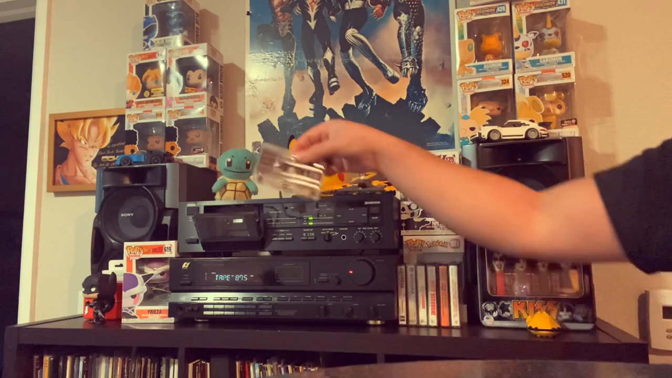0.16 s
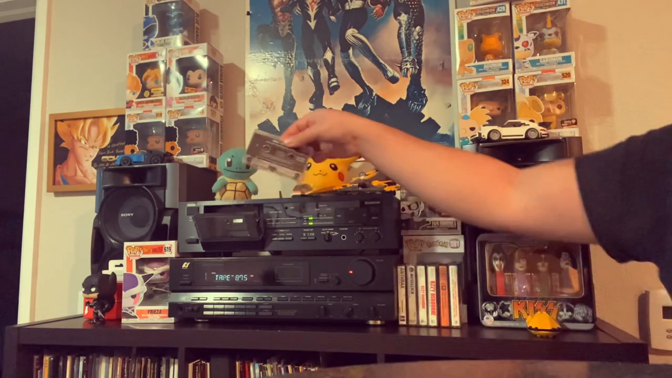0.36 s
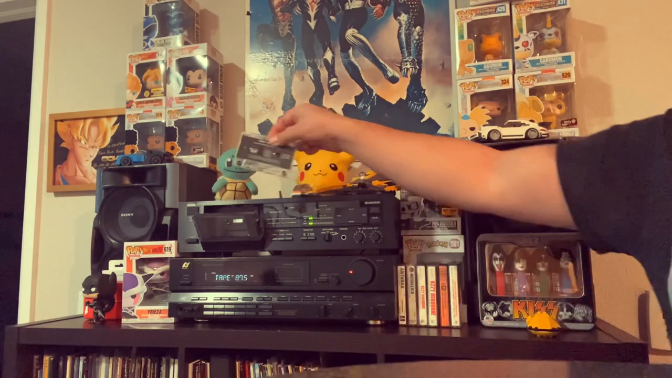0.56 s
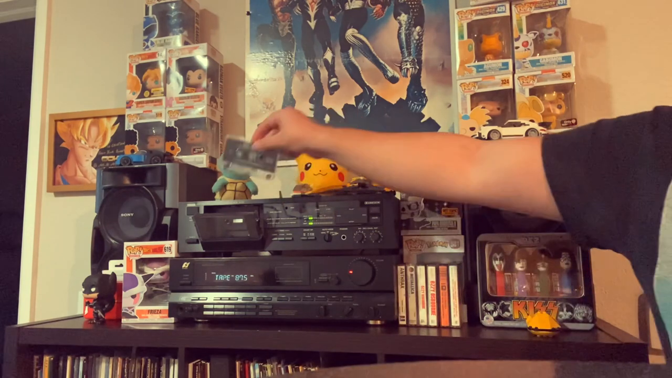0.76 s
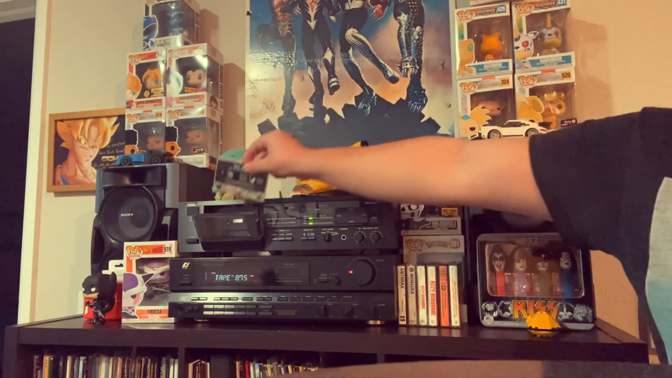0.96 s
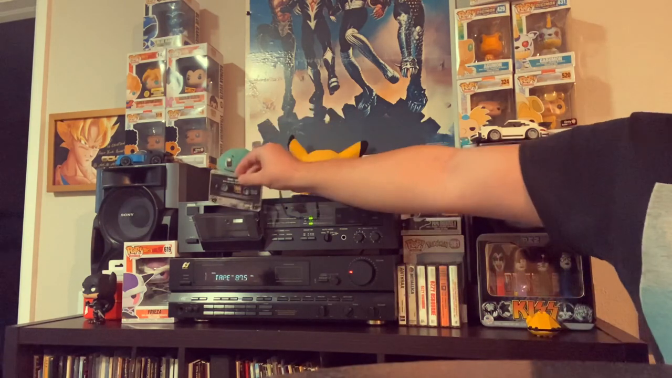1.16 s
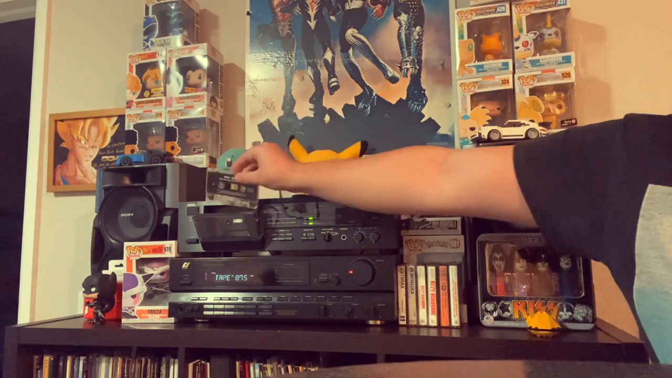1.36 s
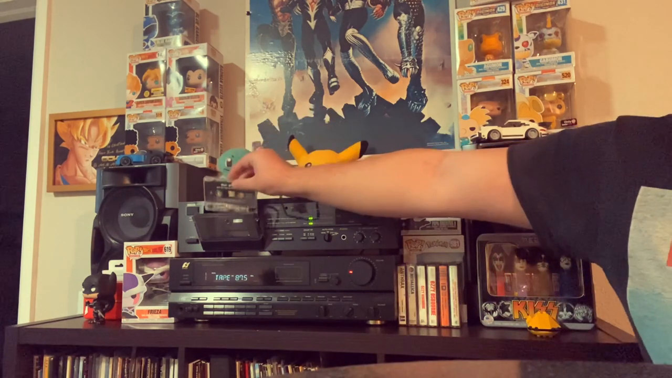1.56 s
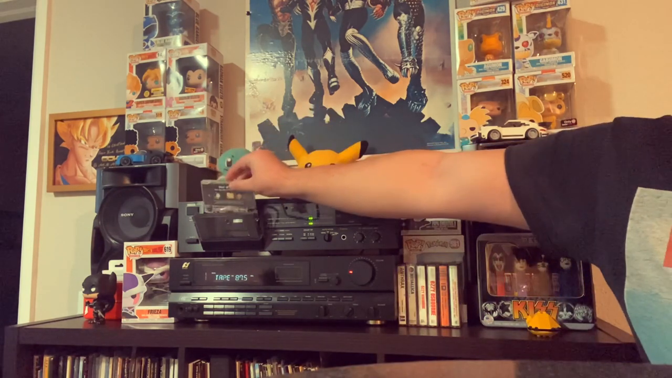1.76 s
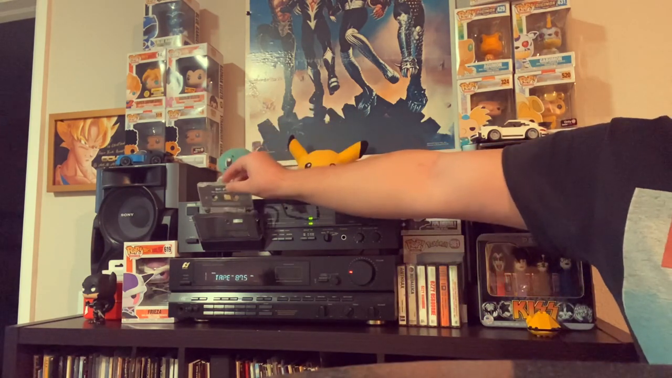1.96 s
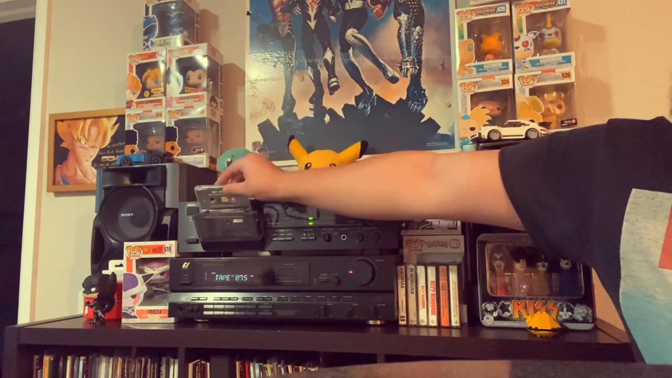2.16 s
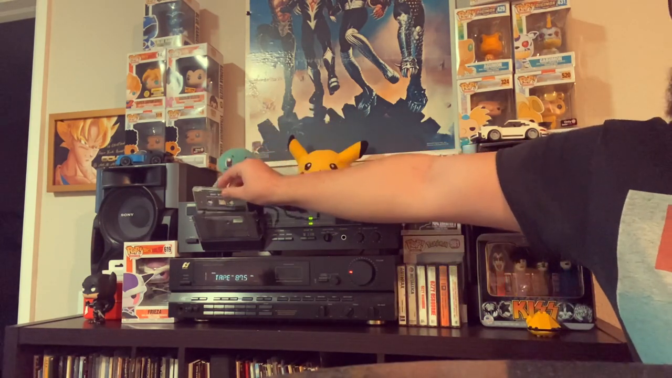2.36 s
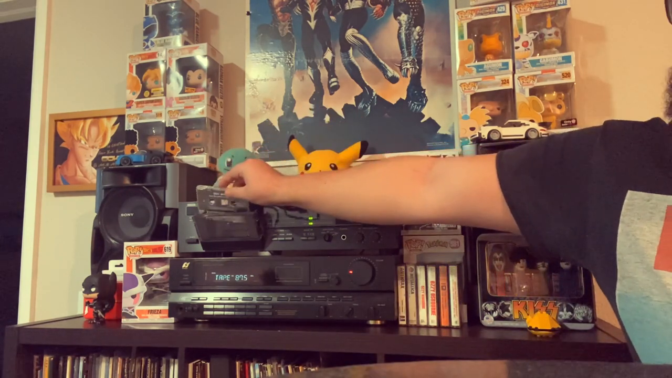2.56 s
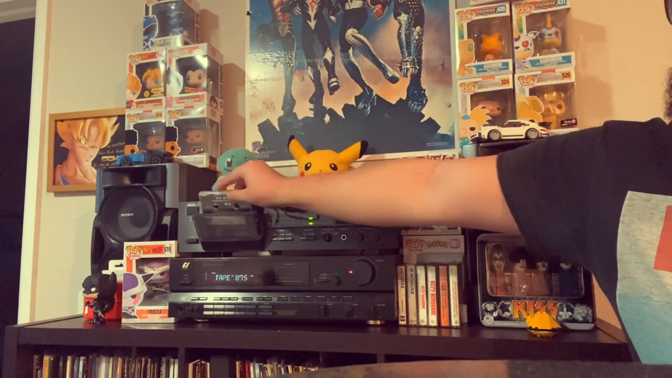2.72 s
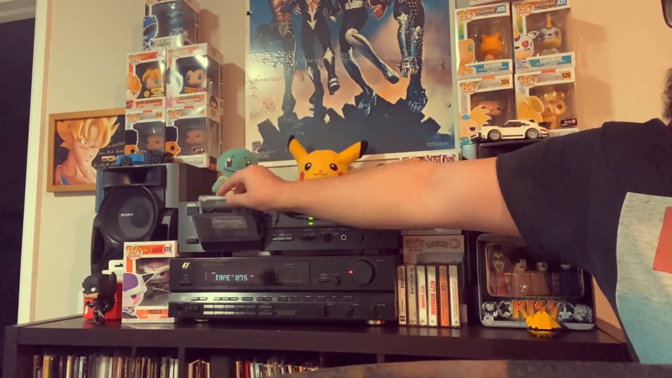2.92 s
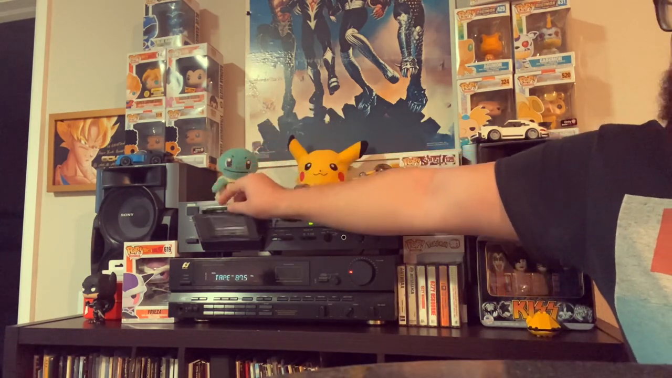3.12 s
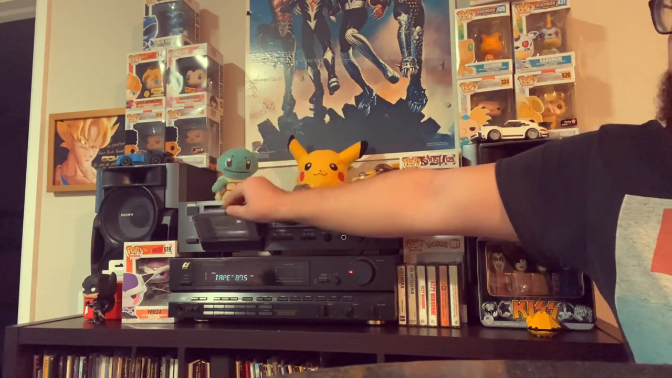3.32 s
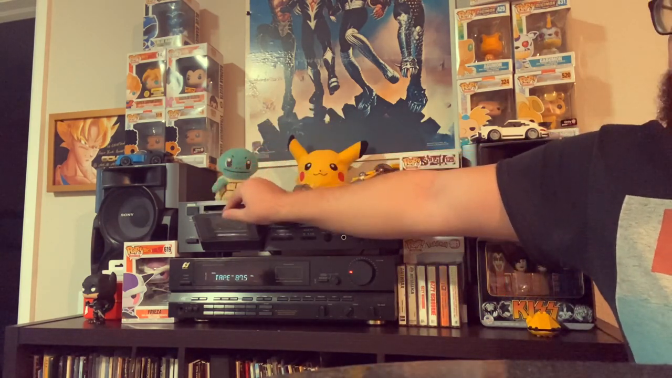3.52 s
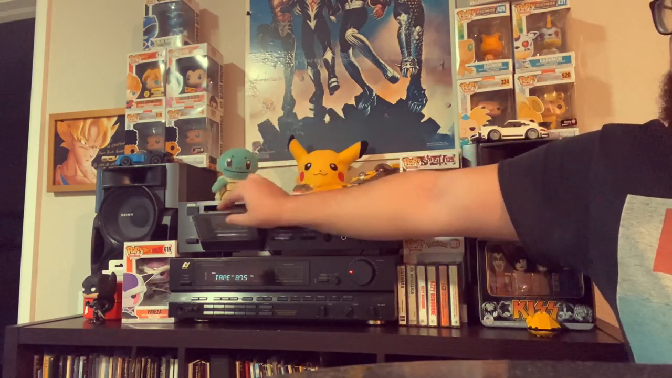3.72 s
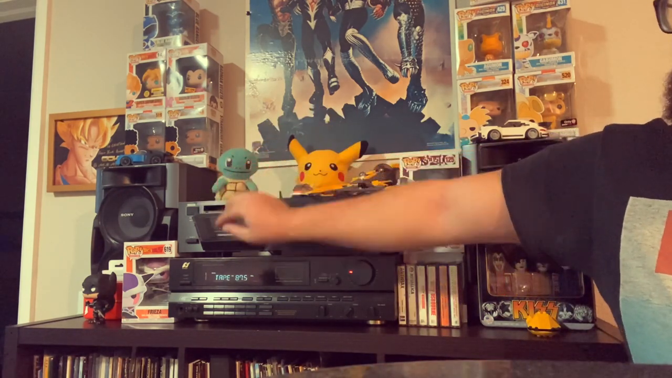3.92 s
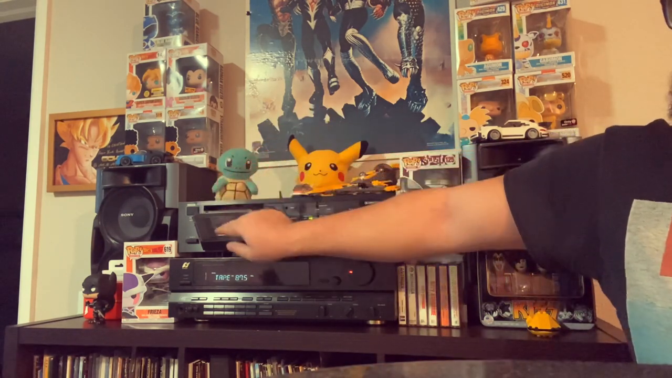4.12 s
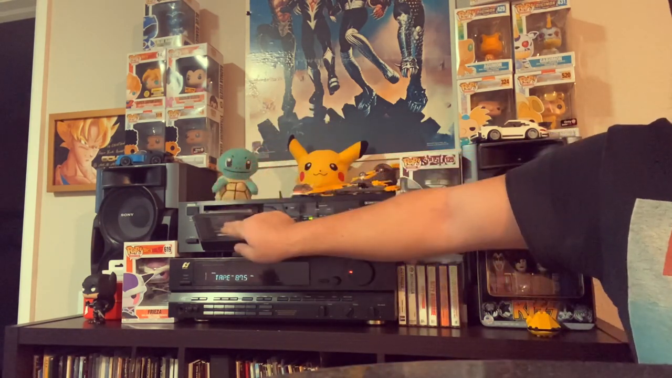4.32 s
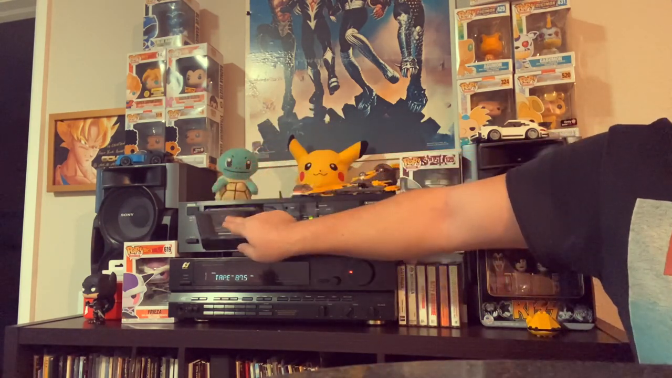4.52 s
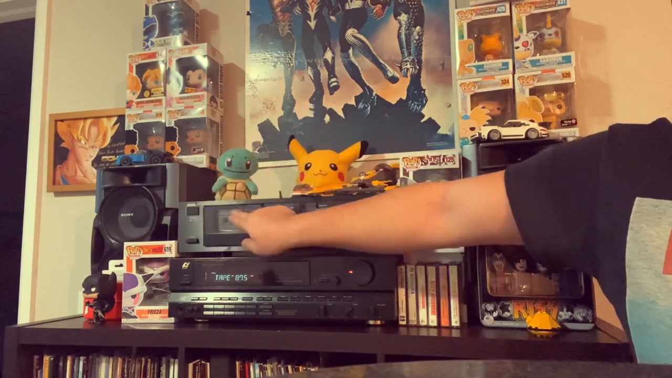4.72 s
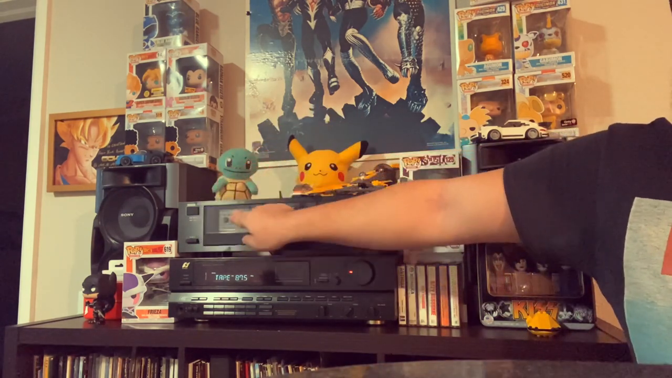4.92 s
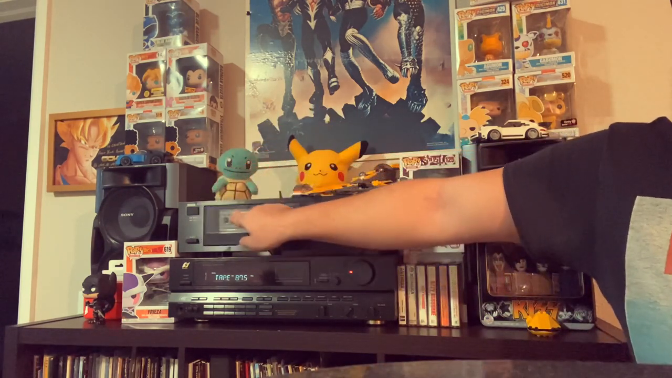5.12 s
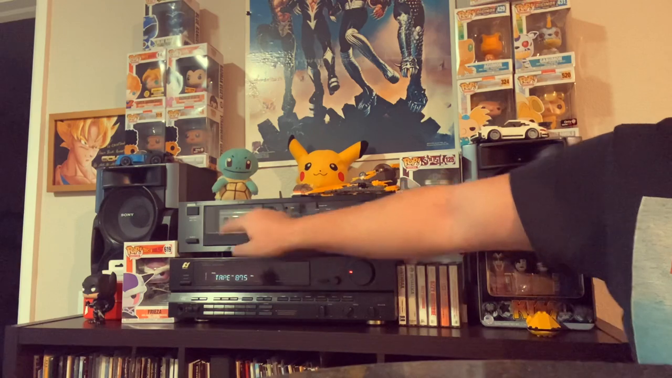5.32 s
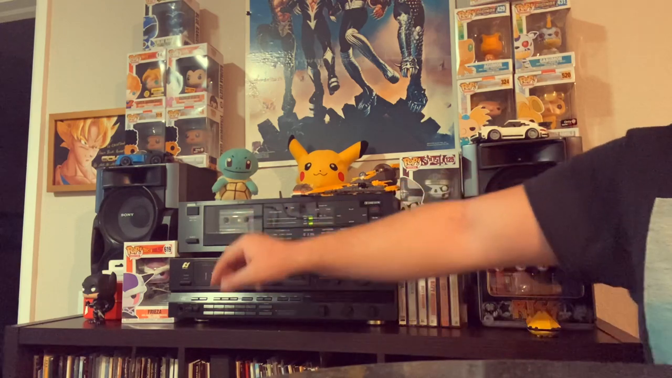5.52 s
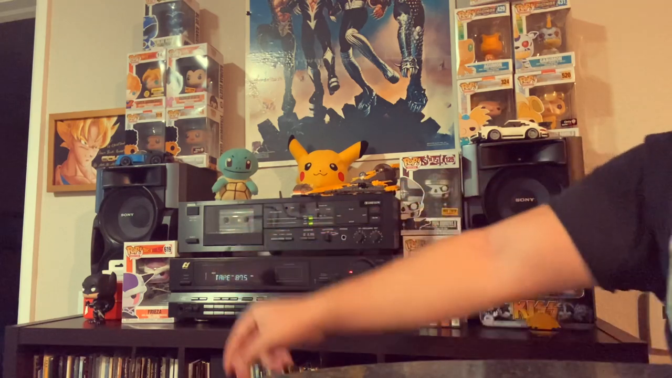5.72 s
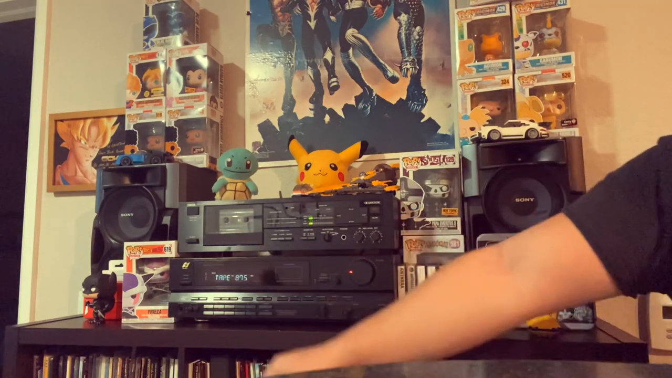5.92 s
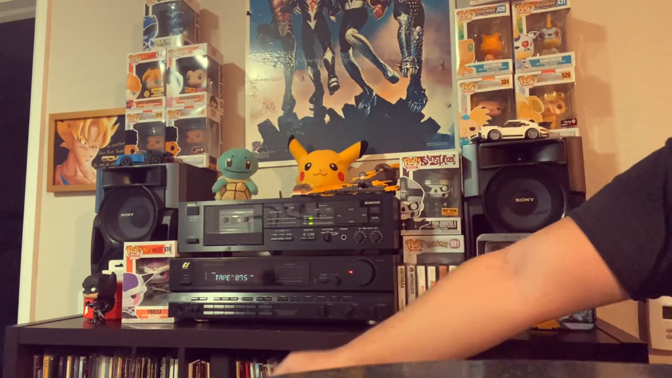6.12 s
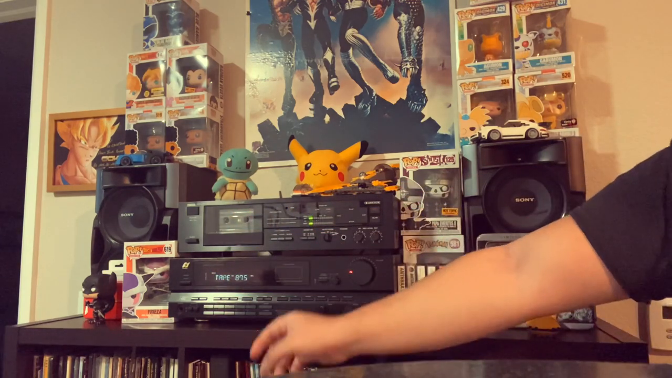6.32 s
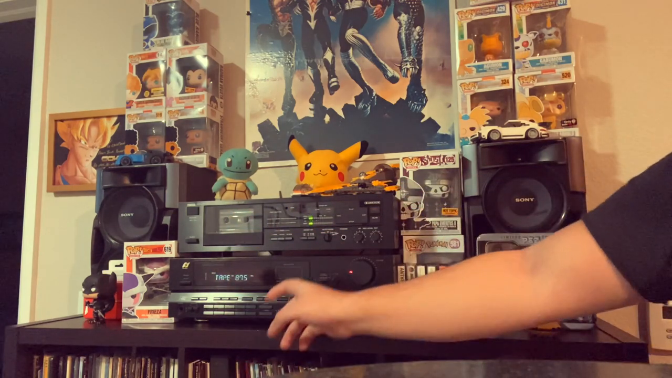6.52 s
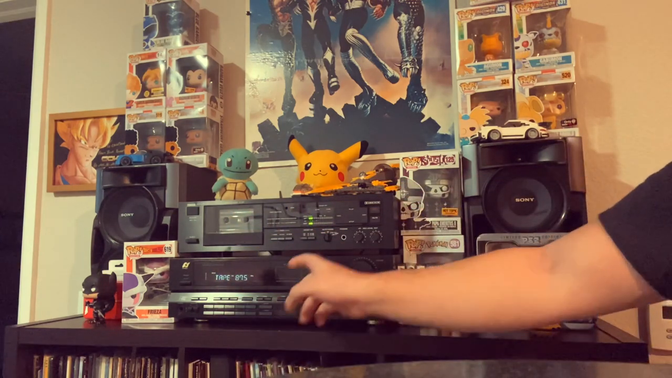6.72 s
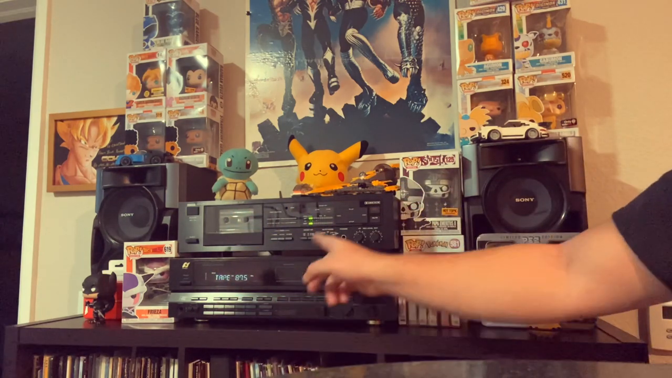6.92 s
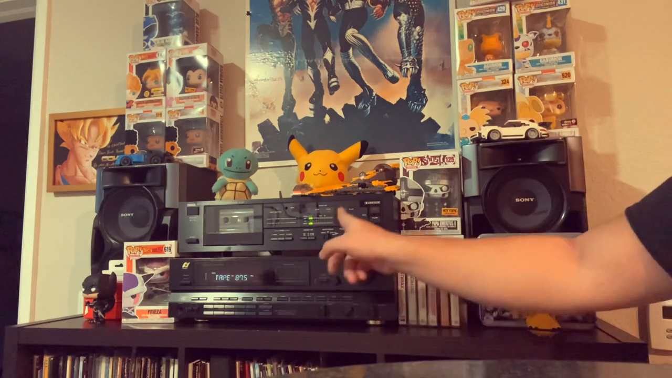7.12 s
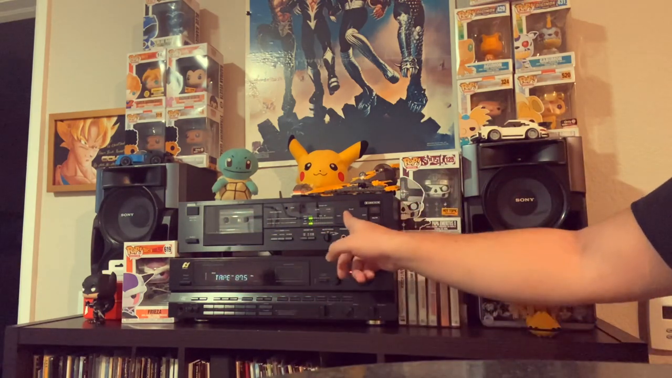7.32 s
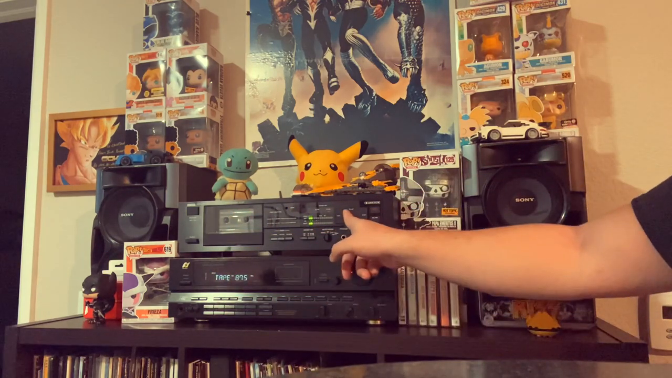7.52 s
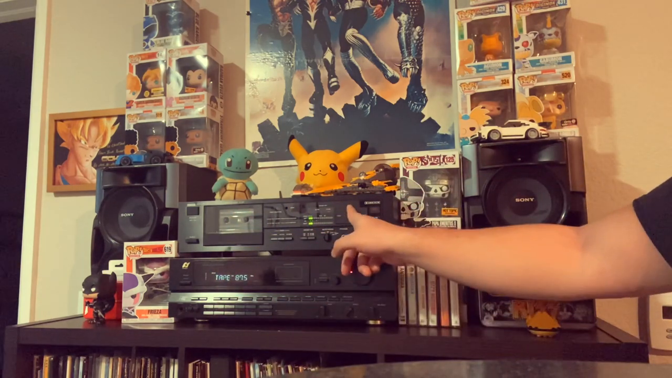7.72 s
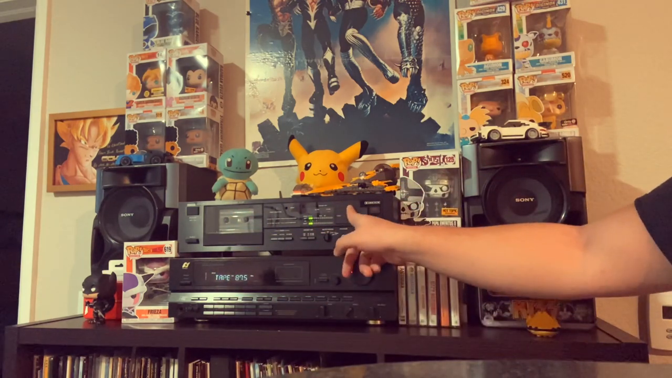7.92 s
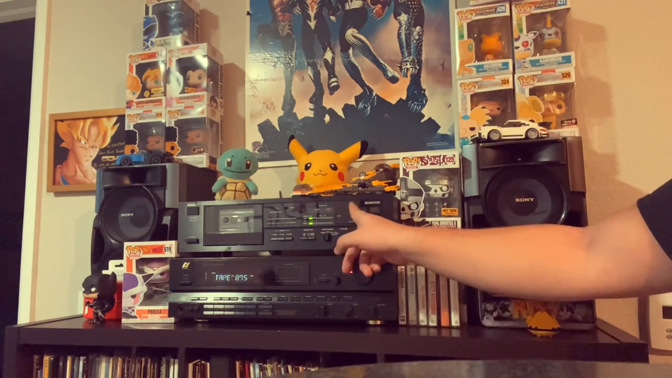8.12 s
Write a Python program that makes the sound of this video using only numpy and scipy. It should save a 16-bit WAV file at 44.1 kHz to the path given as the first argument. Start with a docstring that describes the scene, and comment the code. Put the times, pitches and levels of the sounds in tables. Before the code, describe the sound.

A cassette is fumbled into a tape deck in a small living room. Faint ticks and hollow taps lead to a tight rattle of plastic, then a firm clack as it drops in. After a pause, the door slides and chirps shut with a clattering burst and a sharp latch snap. A long quiet gap follows, then a button click and a chunky mechanical clunk. Stereo microphone at a short distance, with low hum and dark room noise.

```python
"""Cassette into a tape deck

A cassette is fumbled into the open door of a tape deck and drops home; the door squeaks shut and latches.
Then a button is pressed and the transport clunks into gear. Contacts are noise cracks that ring decaying
modes of the struck part; hollow knocks, sliding grit and stick-slip chirps join them. All of these echo
in a small living room, over drifting hum lines, a thin fluttering whine, room noise and soft low thuds.
"""
import sys
import numpy as np
from scipy import signal
from scipy.fft import rfft, irfft, next_fast_len
from scipy.io import wavfile
from scipy.ndimage import uniform_filter1d

SR = 44100
rng = np.random.default_rng(int(sys.argv[2]) if len(sys.argv) > 2 else 0)


def master(y):
    """Save y as 16-bit WAV."""
    cut = np.clip(np.atleast_2d(y).T, -1, 1)
    pcm = np.round(cut * 32767)  # scale
    wavfile.write(sys.argv[1], SR, pcm.astype(np.int16))


N = 360297


def amp(db):
    """Decibels to gain."""
    return 10 ** (np.asarray(db) / 20)


def unit(x):
    """Scales to rms 1."""
    return x / np.sqrt(np.mean(x ** 2) + 1e-20)


def read(points, hz):
    """Reads a table on a log-frequency axis."""
    f, value = np.transpose(points)
    return np.interp(np.log(hz + 1), np.log(f + 1), value)


def add(mix, s, sound):
    """Mixes a sound in at time s."""
    part = mix[:, max(round(s * SR), 0):][:, :sound.shape[1]]
    part += sound[:, :part.shape[1]]


def causal(db):
    """Minimum-phase spectrum with this gain: starts sharply, rings only afterwards."""
    log_gain = np.log(amp(np.concatenate([db, db[-2:0:-1]])))
    return np.exp(np.conj(signal.hilbert(log_gain)))[:len(db)]


def pair(z, likeness):
    """Makes two unrelated spectra into a partly alike left and right."""
    c = np.clip(likeness, -1, 1)
    return np.array([z[0], c * z[0] + np.sqrt(1 - c ** 2) * z[1]])


def wander(rate_hz):
    """A smooth random curve of rms 1."""
    hz = np.fft.rfftfreq(N, 1 / SR)
    return unit(irfft(rfft(rng.standard_normal(N)) / (1 + (hz / rate_hz) ** 4), N))


# deck at the two ports, left minus right: f/Hz, level/dB
PORT_BALANCE_DB = [(150, -1.5), (450, -2), (800, 3), (1300, -0.5), (2300, 0), (3500, 0), (5000, 1),
                   (5700, 0), (8000, 0.7)]
# phase lead of the left port: f/Hz, lead/rad
PORT_PHASE_RAD = [(100, 0.23), (1000, 0.49), (1700, 1.8), (2100, 1.9), (4200, 4.73), (5500, 4.23),
                  (7000, 8.8), (8000, 7.6), (9200, 7.1), (10200, 5.2), (12400, 3.3), (13500, 3.2),
                  (15000, .3)]


def at_ports(z, hz):
    """Spectrum of the deck at two microphone ports that differ in level and phase."""
    z = z * amp(np.outer([.5, -.5], read(PORT_BALANCE_DB, hz)))
    z[1] *= np.exp(-1j * read(PORT_PHASE_RAD, hz))
    return z


def ports(x):
    """One sound from the deck as the two microphone ports hear it."""
    hz = np.fft.rfftfreq(N, 1 / SR)
    return irfft(at_ports(rfft(x), hz), N)


# plastic contacts: t/s, level/dB near 1 kHz, thump/dB, clack/dB, snap/dB (these three re level),
# contact/s, struck spot f/Hz, its height/dB
CLICKS = [ (.338, -22, -20, -14, -43, 0.0024, 1270, 4), (.6396, -25, -18, -16.5, -16, .009, 9400, 5),
          (1.031, -15, 5, -13, -19, 0.0045, 5550, 6), (1.4621, -9, 4.5, -17.5, -21, 0.0043, 5530, 5.1),
          (1.616, -14.5, 4.5, -21, -30, 0.012, 2180, 3), (2.188, -18.5, 8, -11, -22, 0.002, 1360, 5),
          (2.194, -14, 8.5, -18, -28, .005, 800, 5), (2.209, -17, 14, -10, -19, .003, 1210, 5),
          (2.2252, -16.5, 7, -12, -16, 0.0015, 1700, 4), (2.2332, -15.5, 7, -8, -6.5, 0.0012, 7000, 13),
          (2.256, -17, 15, -3.5, -26, 0.0022, 1750, 4), (2.474, -18.5, -12, -22, -34, 0.0097, 1230, 3),
          (2.485, -14, 6.5, -10, -21.5, 0.0025, 1320, 4), (2.5695, -13.5, 4.5, -11, -16, .003, 4370, 6),
          (2.5853, -8, -5, -13.5, -13.5, 0.0014, 4700, 4), (2.592, -22, 7, -22, -20, .002, 9400, 5),
          (2.613, -10, -4, -7.5, -19, 0.0025, 3100, 6.3), (2.625, -13.5, 8.5, -13, -12, 0.0023, 4420, 4),
          (2.8014, -32, 15, -6, -7.5, 0.0077, 7800, 4), (2.8713, -41.5, 21, 2, -2, 0.0021, 7350, 7),
          (2.9146, -30.5, 26, -5, -11, 0.0022, 7400, 8), (3.198, -24.5, 8, -3, -34, 0.023, 2120, 7),
          (3.2484, -6.5, -4, -9, -2, 0.0043, 1040, 7), (3.259, -4.5, 9, -2, -5, 0.003, 1140, 4),
          (3.2635, -3, 9, -3, -12, 0.0066, 4380, 3), (4.103, -33, -19, -7.5, -10.5, .0008, 9350, 5),
          (4.353, -34, 11.5, -12.5, -4.5, .0014, 4700, 6), (4.386, -20.5, 5, -14, -16, 0.002, 5000, 5),
          (4.398, -16, 0.5, -19, -34, 0.02, 1070, 5), (4.516, -13.5, 0, -8.5, -20, 0.01, 2145, 4),
          (4.59, -23.5, -6.5, -10, -30.5, 0.0037, 940, 6),
          (4.6271, -13, -11.5, -1, -13.5, 0.0039, 1720, 10), (4.641, -14.5, -21.5, 1, -4, 0.0015, 1980, 9),
          (4.663, -19, -4.5, -12.5, -13.5, .005, 1150, 4), (4.687, -5, -7.5, -5, -13.5, .002, 1875, 5),
          (4.696, -13.5, -6.5, -9, -22.5, .003, 990, 4), (4.713, -10, -2, -3, -20.5, .0024, 900, 6),
          (4.7299, -4.5, 9.5, 1, 2, 0.005, 581, 6), (4.746, -4.5, 3.5, -4.5, -12.5, 0.0027, 838.5, 8),
          (4.8898, 3.5, -2.5, -2.5, -2, 0.0021, 5470, 3.5), (4.896, -13, 0, -4, -10, 0.0094, 680, 5),
          (7.444, -15, 2, -18, -33, .006, 2380, 4), (7.455, -12, -1, -16.5, -43, 0.0084, 916, 3),
          (7.731, -11.5, -4, -13, -29, 0.0099, 2290, 4), (7.7463, -4, -3, -9.5, 2, 0.0013, 1030, 4),
          (7.7498, -4.5, -9, 1.5, -8, .005, 940, 4), (7.759, -4.5, -8.5, -8, -14, 0.004, 1610, 4),
          (7.7753, -4, 2, -1.5, 1.5, 0.003, 4400, 5), (7.7825, -14, 3.5, -4, -4, .003, 1750, 5),
          (7.952, -23, 13, -15, -13, 0.0034, 6000, 3), (8.0035, -11, 4, -5, -21, 0.0031, 3230, 6),
          (8.028, -12.5, 7, -25, -38, 0.013, 605, 5)]
# where thump, level, clack and snap apply: f/Hz
CLICK_BANDS_HZ = [300, 1050, 3200, 8500]
# colour common to all clicks: f/Hz, level/dB
PLASTIC_DB = [(40, -17), (110, -9), (200, 1.5), (370, -3), (640, -9), (900, -2), (1250, 2), (1500, -4),
              (2000, 0.5), (3200, -0.5), (5300, 0), (7500, -1), (10800, -1.5), (12700, -6), (15500, -18.5)]
# likeness of the clicks at the two ports: f/Hz, likeness/0-1
PORT_LIKENESS = [(200, 0.98), (1000, 0.74), (3000, 0.52), (5300, 0.883), (6100, .4), (7200, 0.64),
                 (9500, 1), (15000, 0.75)]
# modes of each struck part: f/Hz, level/dB, t60/s
SHELL = [(369, -21, 0.13), (740, -24.5, .12), (956, -21.5, 0.06), (1267, -13.5, 0.055), (1407, -16, 0.18),
         (2340, -15, .1), (5470, -14.5, 0.072), (9560, -9, 0.027)]
WELL = [(222, -33, 0.26), (380, -29.5, 0.097), (556, -21, 0.13), (900, -15, 0.029), (1160, -26, 0.021),
        (1350, -9.5, 0.014), (2125, -14, 0.23), (2535, -18, 0.18), (3100, -19.5, 0.04), (9600, -16, 0.056)]
DOOR = [(400.5, -26.5, .12), (510.5, -18.5, 0.1011), (920, -14.5, 0.041), (1271, -21.5, 0.083),
        (1650, -18.5, 0.05), (2140, -17, 0.042), (2840, -25.5, .05), (4307, -20, .035),
        (5200, -12.5, 0.055), (9120, -10.5, .02)]
LATCH = [(182, -21, 0.23), (311.1, -18.5, 0.17), (550, -18, 0.17), (792, -19.5, .18), (1051, -21, 0.054),
         (1364, -28, 0.1), (1690, -29.5, 0.13), (1990, -24, 0.066), (2490, -20.5, 0.42),
         (4320, -20.5, 0.034), (4950, -17.5, 0.013), (5500, -12, 0.0078)]
TRANSPORT = [(315, -26.5, 0.31), (513, -12, 0.047), (738, -16, 0.06), (895, -11.5, 0.049),
             (1030, -21, 0.025), (1660, -13, 0.048), (2134, -21, 0.09), (2950, -13, 0.069),
             (3100, -13, 0.04), (4590, -18, .05), (7770, -22, 0.066)]
BUTTON = [(329, -25, 0.093), (574, -17.5, 0.077), (882, -18.5, 0.1), (1290, -32, 0.052),
          (1690, -14.5, 0.026), (2645, -8.5, 0.022), (3300, -14, .012), (3830, -16, 0.013)]
GUIDES = [(342, -38, .15), (885, -17.5, 0.069), (1280, -15, 0.055), (1386, -28, 0.11), (2310, -23, .03),
          (3100, -20, 0.023), (3570, -27, .08), (4790, -15, .05), (5500, -10, .025), (9130, -12.5, 0.024)]
# part handled from each moment on: t/s, modes
PARTS = [(0, SHELL), (2, GUIDES), (3.2, WELL), (4.3, DOOR), (4.85, LATCH), (7, BUTTON), (7.74, TRANSPORT),
         (7.9, BUTTON)]
SPOT_WIDTH = 0.074  # half width of the spot's resonance, share of its f
REBOUND_S, REBOUND_DB = 0.0067, -10.5  # nominal delay, level re contact


def contact_envelope(t, contact_s, chatter_s, chatter_db):
    """A firm contact is over at once, a grazing one builds and fades more slowly; each rebounds once."""
    envelope = np.exp(-t / contact_s) + amp(chatter_db) * np.exp(-t / chatter_s)
    envelope *= 1 - np.exp(-t / (0.3 * contact_s))
    delay_s = REBOUND_S * rng.uniform(.5, 1.3)
    return envelope + amp(REBOUND_DB) * np.interp(t - delay_s, t, envelope)


def part_ring(t, part, ring_db, detune, vary_db, count):
    """Decaying modes of the struck part, each a cluster of close neighbours that beat."""
    mode_hz, mode_db, t60_s = np.transpose(part)[:, :, None]
    # grip detunes the modes; place of the blow sets strengths and phases
    mode_db = mode_db + vary_db * rng.standard_normal(mode_db.shape)
    cluster_hz = mode_hz * (1 + detune * rng.standard_normal((count, 1, len(part), 1)))
    turns = cluster_hz * t + rng.random((count, 2, len(part), 1))
    rings = np.sin(2 * np.pi * turns).sum(0) * np.exp(-np.log(1000) * t / t60_s)
    rings /= np.linalg.norm(rings, axis=2, keepdims=True)
    return (amp(mode_db + ring_db) * rings).sum(1)


def clicks(chatter_s=0.012, chatter_db=-12, ring_db=-1, detune=.016, vary_db=2.5, count=4, size=12000):
    """Each contact is a sharp noise crack with rebound and chatter, and sets the struck part ringing."""
    t, hz, out = np.arange(size) / SR, np.fft.rfftfreq(size, 1 / SR), np.zeros((2, N))
    for s, level_db, thump_db, clack_db, snap_db, contact_s, spot_hz, spot_db in CLICKS:
        envelope = contact_envelope(t, contact_s, chatter_s, chatter_db)
        crack = rfft(envelope * rng.standard_normal((2, size)))
        # a short contact excites every region of the spectrum about equally
        crack /= np.sqrt(uniform_filter1d(abs(crack) ** 2, size=330, axis=1))
        part = [modes for since, modes in PARTS if s >= since][-1]
        ring = part_ring(t, part, ring_db, detune, vary_db, count)
        resonance_db = spot_db / (1 + ((hz / spot_hz - 1) / SPOT_WIDTH) ** 2)
        hardness_db = read(list(zip(CLICK_BANDS_HZ, [thump_db, 0, clack_db, snap_db])), hz)
        colour_db = level_db + hardness_db + resonance_db + read(PLASTIC_DB, hz)
        z = pair(crack + rfft(ring), read(PORT_LIKENESS, hz)) * causal(colour_db)
        add(out, s, irfft(at_ports(z, hz))[:, :size * 3 // 4])
    return out


# shell on the door, finger on the buttons: t/s, level/dB, f/Hz
KNOCKS = [(1.032, -55, 516), (1.4635, -49.5, 614), (2.486, -42, 1160), (2.5862, -31, 1070),
          (2.6132, -38.5, 940), (7.456, -46, 796)]
KNOCK_CYCLES = 0.55  # envelope peaks after this many cycles


def knocks(size=2000):
    """A dull bump on hollow plastic: a few cycles that swell and die at once."""
    t, out = np.arange(size) / SR, np.zeros((1, N))
    for s, db, hz in KNOCKS:
        age = t * hz / KNOCK_CYCLES
        bump = amp(db) * age * np.exp(1 - age) * np.sin(2 * np.pi * hz * t)
        add(out, s, bump[None])
    return ports(out)


# strokes of plastic on plastic: start t/s, length/s, start level/dB, swell over the stroke/dB, treble/dB
SLIDES = [(1.326, 0.21, -79, 10, -15), (1.884, 0.26, -79, 12.5, -9), (2.193, 0.173, -59.5, -13, -9),
          (2.68, 0.32, -72.5, -5.5, 2.5), (3.007, 0.11, -69, 4, -26), (3.198, 0.069, -75, 23.5, 5),
          (3.758, 0.23, -89, 0.5, 9.5), (4.11, 0.5, -76.5, -3.5, -8.5), (4.501, 0.26, -73.5, 23, 2),
          (7.787, .45, -72, 1, -5)]
# colour of the grit: f/Hz, level/dB
SLIDE_COLOUR_DB = [(100, -2.5), (900, 5), (1400, 5.5), (2500, -10), (5500, -14), (10000, -14),
                   (15000, -41.5)]
SLIDE_EDGE_S, SLIDE_TREBLE_HZ = 0.017, 2980  # soft start and stop; corner above which treble/dB acts


def slides(slips_per_s=1500, uneven_db=2.0):
    """Tiny slips of uneven size while the shell, the door or the transport slides; a few catch harder."""
    t, hz, out = np.arange(N) / SR, np.fft.rfftfreq(N, 1 / SR), np.zeros((2, N))
    slip_sizes = amp(uneven_db * np.minimum(rng.exponential(1, N), 4))
    slips = (rng.random(N) < slips_per_s / SR) * slip_sizes
    slip_noise = rfft(slips * rng.standard_normal((2, N)))
    grit = unit(irfft(slip_noise * causal(read(SLIDE_COLOUR_DB, hz)), N))
    rub = irfft(rfft(grit) / (1 + (hz / SLIDE_TREBLE_HZ) ** 4), N)
    for start, length, db, swell_db, treble_db in SLIDES:
        progress = np.clip((t - start) / length, 0, 1)
        inside_s = np.minimum(t - start, start + length - t)
        touching = np.clip(inside_s / SLIDE_EDGE_S + .5, 0, 1)
        out += (rub + amp(treble_db) * (grit - rub)) * amp(db + swell_db * progress) * touching
    return out


# closing door, fingertip on a button: t/s, length/s, level/dB, f/Hz, rise/share of f
SQUEAKS = [(4.59, 0.025, -52, 890, .03), (4.621, .02, -46.5, 1650, .25), (4.686, .017, -30, 890, .18),
           (4.706, .006, -32.5, 1640, .04), (4.745, 0.014, -35, 850.4, .02), (7.58, 0.042, -59, 1114, .08)]


def squeaks(overtone_db=-15, jitter=0.018, jitter_hz=200):
    """A surface sticks and slips: short chirps of unsteady, rising pitch with one overtone."""
    t, out = np.arange(N) / SR, np.zeros(N)
    unsteady = 1 + jitter * wander(jitter_hz)
    for s, length, db, hz, rise in SQUEAKS:
        progress = np.clip((t - s) / length, 0, 1)
        angle = 2 * np.pi * np.cumsum(hz * (1 + rise * progress) * unsteady) / SR
        envelope = np.sqrt(np.abs(np.sin(np.pi * progress))) * (1 - progress / 2)
        out += amp(db) * envelope * (np.sin(angle) + amp(overtone_db) * np.sin(2 * angle))
    return ports(out)


# decay: f/Hz, t60/s
ROOM_T60_S = [(100, 1), (300, 0.064), (1000, 0.35), (2500, 0.35), (5500, 0.36), (9000, 0.28), (15000, 0.19)]
# re direct sound: f/Hz, level/dB
ROOM_LEVEL_DB = [(100, -2.5), (400, 7), (1000, -3.5), (3000, -3.5), (6000, -6.5), (12000, -9)]
# left-right: f/Hz, likeness
ROOM_LIKENESS = [(100, 1), (450, 0.34), (1500, 0.18), (6000, .1), (7500, .6), (9500, 1), (14000, 1)]


def room(x, first_s=0.0014, build_s=0.0016):
    """Reflections from the shelf and walls thicken into a short tail that decays band by band."""
    t = np.arange(SR * 3 // 4) / SR
    taps = rng.choice([-1., 1.], (2, len(t))) * (rng.random((2, len(t))) < 4000 / SR)  # 4000 per s
    taps *= 1 - np.exp(-np.maximum(t - first_s, 0) / build_s)
    band_hz, at_s, z = signal.stft(taps, SR, nperseg=256)
    decay = np.exp(-np.log(1000) * at_s / read(ROOM_T60_S, band_hz)[:, None])
    tail = signal.istft(z * decay, SR, nperseg=256)[1]
    size = next_fast_len(N + SR, real=True)
    hz, z = np.fft.rfftfreq(size, 1 / SR), rfft(tail, size)
    z /= np.sqrt(uniform_filter1d(abs(z) ** 2, size=1500, axis=1))  # flat before ROOM_LEVEL_DB
    z = pair(z, read(ROOM_LIKENESS, hz))
    return irfft(rfft(x, size) * z * amp(read(ROOM_LEVEL_DB, hz)), size)[:, :N]


# lines: f/Hz, level/dB, left minus right/dB, waver/0-1
HUM = [(58.4, -60.5, 1, 0.96), (118.4, -72, -4, 0.2), (138.3, -56.5, -6.5, 0.16), (164, -68.5, -3.5, 1)]


def hum(lag_s=0.00027, waver_hz=3):
    """Mains hum and a fan's drone: lines with a randomly drifting share, later on the left."""
    t, hz, out = np.arange(N) / SR, np.fft.fftfreq(N, 1 / SR), np.zeros((2, N))
    for line_hz, db, side_db, waver in HUM:
        drift = np.fft.ifft(np.exp(2j * np.pi * rng.random(N)) / (1 + (hz / waver_hz) ** 2))
        share = np.clip(waver, 0, 1)
        swing = np.sqrt(1 - share ** 2) + share * drift / drift.std()
        port_t = t - np.array([[lag_s], [0]])
        line = (swing * np.exp(2j * np.pi * line_hz * port_t)).real
        out += unit(line) * amp([[db + side_db / 2], [db - side_db / 2]])
    return out


WHINE_HZ, WHINE_DB, WHINE_SIDE_DB = 2160, -100, 12.5  # pitch, steady level, left minus right
WHINE_SWELL_S, WHINE_HALF_S, WHINE_SWELL_DB = 6.24, 0.3, -88.5  # swell: middle, half length, level


def whine(flutter_db=1.8, flutter_hz=18):
    """A thin electronic whine, mostly on the left: a level-fluttering sine that swells for a moment."""
    t = np.arange(N) / SR
    swell = amp(WHINE_SWELL_DB) * np.exp(-((t - WHINE_SWELL_S) / WHINE_HALF_S) ** 4)
    sine = np.sin(2 * np.pi * (WHINE_HZ * t + rng.random()))
    tone = unit(sine * amp(flutter_db * wander(flutter_hz)))
    return tone * (amp(WHINE_DB) + swell) * amp([[WHINE_SIDE_DB / 2], [-WHINE_SIDE_DB / 2]])


# still-room spectrum shape: f/Hz, density/dB per Hz
AIR_SHAPE_DB = [(25, -30), (43, -3.5), (62, -2.5), (105, -7.5), (185, -8), (290, -19), (400, -18.5),
                (660, -27), (860, -26.5), (1300, -35), (1600, -41.5), (2400, -48), (4000, -55),
                (6100, -57.5), (7300, -60.5), (10000, -57.5), (11500, -61.5), (12600, -74.5), (14000, -79),
                (16000, -80)]
# left-right: f/Hz, likeness
AIR_LIKENESS = [(60, 0.76), (150, 0.32), (380, 0.37), (950, -0.15), (1800, 0.28), (2700, -0.12),
                (6000, 0.26), (7300, 0.28), (9200, -0.66), (10200, 0.14), (12500, -0.38), (15000, .1)]
# left minus right: f/Hz, level/dB
AIR_BALANCE_DB = [(60, -2.5), (150, -3), (380, -2.5), (950, -1.5), (2380, 1), (5980, 0), (15000, 0.5)]
# soft low thuds: peak t/s, half length/s, level/dB
THUDS = [(0.798, 0.19, -57.5), (1.57, 0.058, -52), (2.246, 0.092, -53.5), (4.59, 0.02, -46),
         (6.7, 0.1, -54), (7.081, 0.038, -55.5), (8.146, .1, -51.5)]
AIR_DB = -56.5  # rms above 170 Hz
RUMBLE_DB, HEAVE_DB, HEAVE_HZ = -64, 0.5, 2.5  # rumble level, depth and rate of its heaving


def air(rumble_hz=100, lag_s=0.00035):
    """Dark room noise, later on the left at low f, over a slowly heaving rumble and soft thuds."""
    t, hz = np.arange(N) / SR, np.fft.rfftfreq(N, 1 / SR)
    z = pair(rfft(rng.standard_normal((2, N))), read(AIR_LIKENESS, hz)) * amp(read(AIR_SHAPE_DB, hz))
    z *= amp(np.outer([.5, -.5], read(AIR_BALANCE_DB, hz)))
    z[0] *= np.exp(-2j * np.pi * hz * lag_s / (1 + (hz / 4000) ** 2))
    upper = irfft(z * (hz > 170), N)
    low_share = 1 / (1 + (hz / rumble_hz) ** 8)
    wash = irfft(z * (1 - low_share), N) * amp(AIR_DB) / upper.std()
    heave = amp(RUMBLE_DB + HEAVE_DB * wander(HEAVE_HZ))
    thuds = sum(amp(db) * np.exp(-((t - s) / half_s) ** 2) for s, half_s, db in THUDS)
    return wash + np.hypot(heave, thuds) * unit(irfft(z * low_share, N))


def scene(catch_db=4.5, catch_hz=25):
    """The deck, its echo in the room, and the steady background."""
    sliding = slides() * amp(catch_db * wander(catch_hz))  # the slide catches and lets go
    deck = clicks() + knocks() + sliding + squeaks()
    return deck + room(deck) + hum() + whine() + air()


EDGE_HZ = 15800


def record(dry):
    """The recorder's band limit: a linear-phase low-pass."""
    low_pass = signal.firwin(255, EDGE_HZ, window=("kaiser", 8), fs=SR)
    return signal.oaconvolve(dry, low_pass[None], "same")


dry = scene()
out = record(dry)
master(out)
```